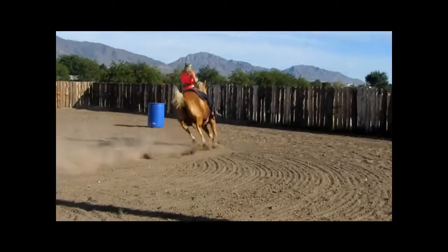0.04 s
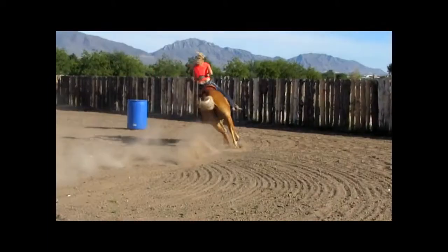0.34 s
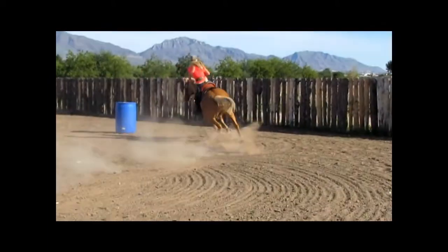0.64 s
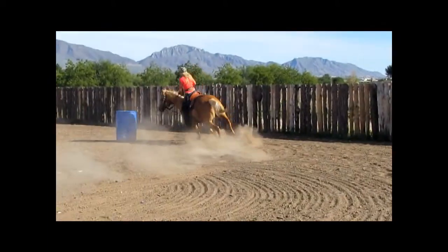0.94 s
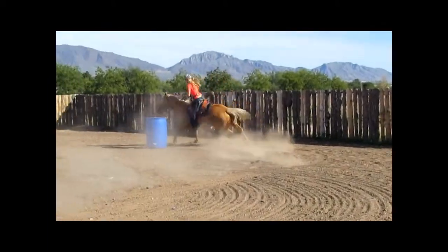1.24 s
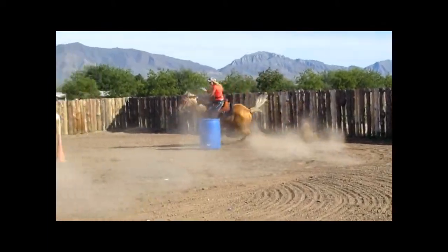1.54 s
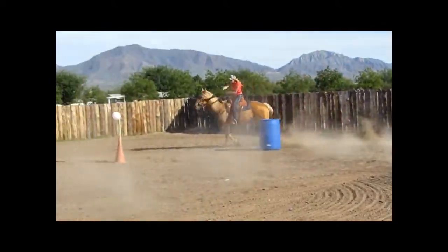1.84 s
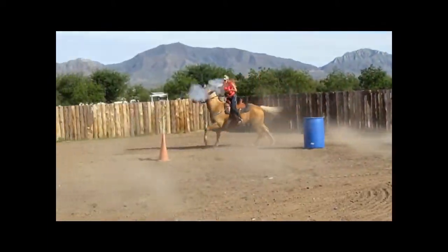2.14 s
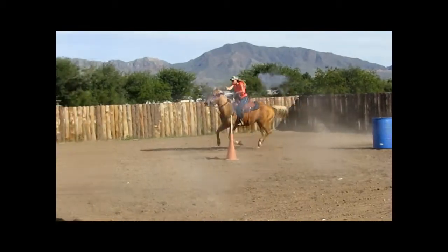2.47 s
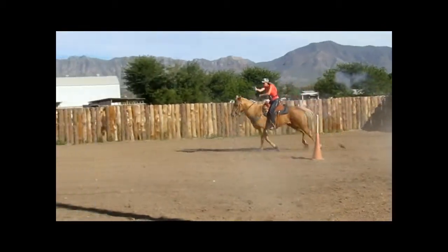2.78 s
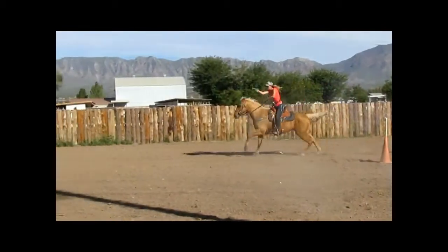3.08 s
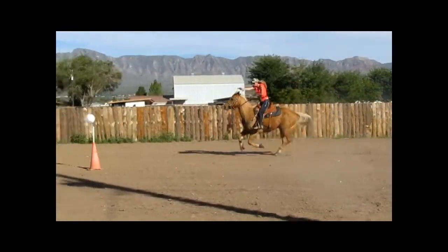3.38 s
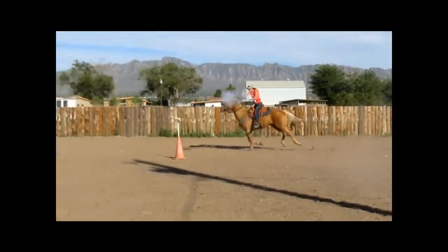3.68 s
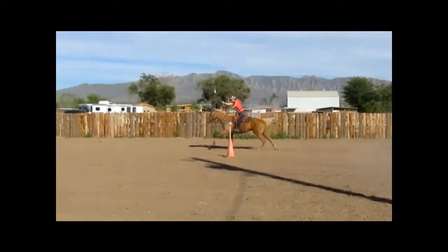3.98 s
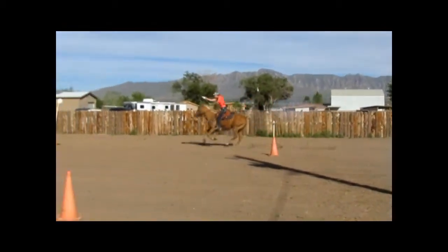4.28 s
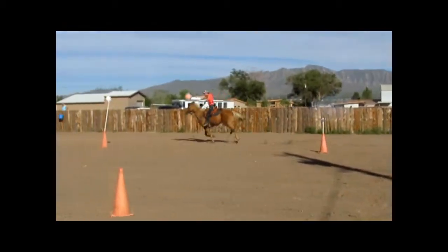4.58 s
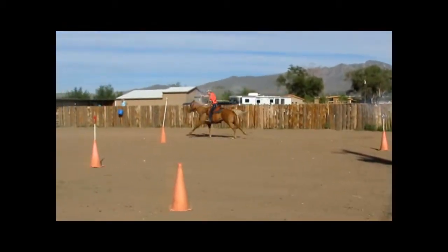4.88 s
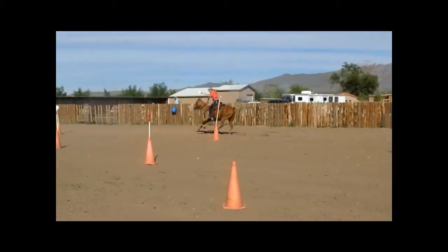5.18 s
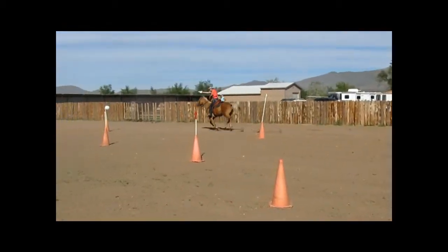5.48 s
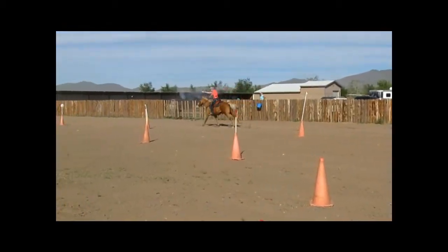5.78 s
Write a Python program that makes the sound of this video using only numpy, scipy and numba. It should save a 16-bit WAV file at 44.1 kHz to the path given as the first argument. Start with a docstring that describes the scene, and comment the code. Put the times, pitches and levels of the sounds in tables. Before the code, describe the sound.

A horse gallops in an open-air dirt arena, heard from some way off over a low outdoor rumble and light gusts on the microphone. For the first two seconds its hooves thud softly, a little to the right, with gritty skids around 0.3 to 0.5 and 1.2 seconds and small knocks of falling clods. A very faint lens motor whine runs until about 2.3 seconds.

At 2.2 seconds a loud, sharp blank revolver shot cracks, followed by others at 3.7, 4.7 and 5.7 seconds. Each briefly overloads the microphone and echoes off a plank fence, sheds and trees, dying away within a second. After every blast the background ducks, then creeps back up. The galloping continues between the shots, with firmer hoofbeats, crunching dirt and knocking clods around 3 to 3.6 seconds. The sound ends near six seconds in the last shot's echo.

```python
"""Four blank revolver shots from a rider galloping round a barrel in an open-air dirt arena.
The camera's stereo microphone is some way off, in a light wind. Each blast overloads it and echoes off
the plank fence, sheds and trees; the gain control ducks at every shot and creeps back up.
Hooves thud, throw clods and skid in loose dirt. Close by, the lens motors whine faintly."""
import sys
import numpy as np
from scipy import signal
from scipy.fft import rfft, irfft
from scipy.io import wavfile
from scipy.ndimage import uniform_filter1d
from numba import njit

SR = 44100
rng = np.random.default_rng(int(sys.argv[2]) if len(sys.argv) > 2 else 0)


def wrap_up_sound(samples):
    """Save the sound to the file named by the first command line argument, as 16-bit audio."""
    columns = np.atleast_2d(samples).T
    # keep every value between -1 and 1, then stretch to whole-number steps
    tamed = np.clip(columns, -1, 1)
    steps = np.round(tamed * 32767).astype(np.int16)
    wavfile.write(sys.argv[1], SR, steps)


N = 261072
TIME = np.arange(N) / SR
# broad rush of loose dirt and of muzzle gas: f/Hz, level/dB
RUSH_SPECTRUM = [(100, -22.5), (400, 3.5), (1100, 2), (2400, -9), (4200, -19), (7300, -18.5), (13000, -27),
                 (14800, -51.5)]


def gunshots(smear_db=-18, smear_t60=0.45, slap_tail_db=-4.5, boom_echo_hz=182.3, lowest_hz=80):
    """Each blast fills the arena; four reflectors each return a sharp slap and a low boom."""
    # t/s, level/dB, ring f/Hz, ring t60/s, boom/dB, boom f/Hz, overtone/dB, scatter/dB, facing fence/dB
    shots = [(2.2395, 35.5, 906, 0.01, -9.5, 220.3, -8, 0.5, -1),
             (3.7329, 35, 858, .015, -9, 195, -19, -0.5, 0.5),
             (4.7431, 34.5, 1010, 0.012, -13.5, 229.6, -14, -3.5, 2),
             (5.7401, 28, 855, 0.0082, -4, 144, -11.5, -13.5, -4)]
    # echo delays, a row per shot as the rider moves: facing fence/s, right fence/s, sheds/s, far wall/s
    echo_delays = [(.0245, .0615, .1867, .281), (.048, .0884, .187, .2584), (.0652, .1058, .162, .2288),
                   (.0758, .119, .167, .2)]
    # those reflectors: slap/dB, tilt/(dB/octave), t60/s, left minus right/dB, boom/dB, drift/(dB/s)
    reflectors = [(-23, -4, .026, -5.5, -24, -1), (-45, 4.5, 0.019, 2, -20, -3),
                  (-32.5, -4.5, 0.034, 1, -41, -2), (-32, -4.5, 0.016, 0, -60, 1.5)]
    # slap off a hard face: f/Hz, level/dB
    slap_spectrum = [(100, -16), (500, -20.5), (900, -11), (1500, 10), (2800, -4.5), (4300, -6.5),
                     (8000, -20), (12500, -29), (15000, -51.5)]
    out, t = np.zeros((2, N)), TIME[:2 ** 13]
    for shot, delays in zip(shots, echo_delays):
        s, db, ring_hz, ring_t60, boom_db, boom_hz, overtone_db, scatter_db, fence_db = shot
        add(out, s, undb(db) * blast(ring_hz, ring_t60, boom_db, boom_hz, overtone_db))
        add(out, s, arena(scatter_db, fence_s=0.048, far_s=delays[2] - 0.012))  # trees ahead of sheds
        for k, (slap_db, tilt, t60, pan_db, low_db, db_per_s) in enumerate(reflectors):
            gain = undb(db + db_per_s * (s - shots[0][0]) + fence_db * (k == 0))
            tail = undb(slap_tail_db) * fade(t, t60) + undb(smear_db) * fade(t, smear_t60)
            slap = undb(slap_db) * pan(pan_db) * strike(slap_spectrum, tail, tick_s=0.00068, tilt=tilt)
            boom = undb(low_db) * pan(-10) * thump(boom_echo_hz, cycles=0.49)
            add(out, s + delays[k], -gain * slap)
            add(out, s + delays[k], gain * boom)
    left, right = cut(out, "highpass", lowest_hz)  # the microphone lets little of the shots' deep bass through
    return np.array([left, np.append(0, right[:-1])])  # the left port hears them a moment sooner


def blast(ring_hz, ring_t60, boom_db, boom_hz, overtone_db, overtone_hz=2750, gas_db=-14):
    """The muzzle's shock front rings the microphone housing, over a low boom and a burst of gas."""
    t = TIME[:SR // 8]
    ring = np.sin(2 * np.pi * ring_hz * t) * fade(t, ring_t60)
    overtone = undb(overtone_db) * np.sin(2 * np.pi * overtone_hz * t) * fade(t, ring_t60)
    boom = undb(boom_db) * np.sin(2 * np.pi * boom_hz * t) * fade(t, t60=0.014)
    gas = undb(gas_db) * noise(RUSH_SPECTRUM, len(t)) * fade(t, t60=0.043)
    return gas - ring - overtone - boom * pan(-2.1)


def arena(scatter_db, fence_s, far_s, patchy_db=1.7, crackle_db=3, bass_hz=400, bass_pan_db=-7):
    """A shot scatters from the rough ground, then the fence planks, then far sheds and trees."""
    # reverberation by band: f/Hz, ground/dB, ground t60/s, fence/dB, fence t60/s, far/dB, far t60/s
    reverberation = [(65, 2.5, 0.06, -21, 0.56, -23, 1), (192, 13, 0.13, -6, 0.46, -13.5, 0.97),
                     (460, 1, 0.17, -10.5, 0.3, -52, 0.91), (1285, 16.5, 0.18, 3, 0.36, -20.5, 1),
                     (2253, 15, 0.095, -1.5, 0.37, -11, 0.72), (4350, 9, 0.096, -6.5, 0.32, -22.5, 0.42),
                     (9000, 0.5, 0.12, -15.5, 0.25, -48, 0.28)]
    out, t = 0, TIME[:3 * 2 ** 14]

    def arrival(db, delay, t60, rise_s):
        """A cluster of reflections builds up and dies away."""
        return undb(db) * fade(t - delay, t60) * (1 - np.exp(-np.maximum(t - delay, 0) / rise_s))

    for hz, ground_db, ground_t60, fence_db, fence_t60, far_db, far_t60 in reverberation:
        ground = arrival(ground_db + scatter_db, 0, ground_t60, rise_s=0.0019)
        fence = arrival(fence_db + scatter_db, fence_s, fence_t60, rise_s=0.0066)
        far = arrival(far_db, far_s, far_t60, rise_s=0.026)
        envelope = np.sqrt(ground ** 2 + fence ** 2 + far ** 2)
        side = pan(bass_pan_db / (1 + (hz / bass_hz) ** 2))  # the fence returns bass from the right
        out = out + band(hz, len(t)) * side * envelope * grains(100, patchy_db, len(t))
    # single planks and branches stand out as crackle above the bass
    crackle = cut(out, "highpass", bass_hz) * grains(300, crackle_db, len(t))
    return cut(out, "lowpass", bass_hz) - crackle


def horse(hoof_hz=175.2, weight_spread_db=2.5, scuff_db=-10, kicked_hz=1200, flight_s=0.025):
    """Four hooves a stride thump and scuff the soft ground, right of centre, and kick up clods."""
    # gallop strides: first hoof t/s, span to the fourth hoof/s, first level/dB, fourth level/dB
    strides = [(-.137, 0.24, -42, -27), (.288, 0.23, -34, -31), (.697, .262, -31.5, -37.5),
               (1.21, 0.2, -42, -37), (1.678, 0.25, -36.5, -27), (1.979, 0.19, -44.5, -40.5),
               (2.74, 0.25, -31, -19), (3.086, 0.24, -26.5, -21.5), (3.488, .21, -23.5, -33),
               (4.021, .28, -25, -26), (4.416, 0.22, -21, -24), (5.06, .245, -24, -21.5),
               (5.402, 0.2, -22.5, -37.5)]
    # when the four hooves land, as shares of that span
    footfalls = [0, .28, .54, 1]
    # the loudest hoof strikes and falling clods: t/s, knock/dB, knock f/Hz, grit/dB
    loud_clods = [(.104, -35, 1000, -80), (.395, -35.5, 1250, -64), (.438, -34.5, 1090, -39),
                  (.448, -38, 1860, -34.5), (.523, -32.5, 1210, -42.5), (.703, -30, 1090, -37),
                  (.818, -37.5, 1440, -56), (1.083, -39, 1330, -63), (1.418, -36, 1080, -67),
                  (1.443, -36, 1660, -52), (1.632, -37, 1670, -44), (1.737, -38, 1340, -55),
                  (1.943, -38, 1060, -60), (1.987, -41, 1200, -61), (2.159, -38, 950, -58.5),
                  (3.309, -27.5, 1750, -42), (3.421, -32, 1860, -33.5), (3.432, -27, 1530, -53),
                  (3.447, -24.5, 1090, -64), (3.597, -34.5, 990, -56), (3.606, -29, 1300, -48),
                  (4.523, -31, 1240, -49), (5.233, -26.5, 1400, -47), (5.532, -31.5, 1300, -49.5),
                  (5.603, -32, 1080, -50), (5.641, -36, 1530, -48)]
    out, t = np.zeros((2, N)), TIME[:2 ** 12]
    for start, span, first_db, last_db in strides:
        for share in footfalls:
            hoof_pitch, clod_pitch, weight = rng.standard_normal(3)
            s = start + share * span
            gain = undb(first_db + share * (last_db - first_db) + weight_spread_db * weight)
            hz = hoof_hz * np.exp(0.12 * hoof_pitch)
            scuff = undb(scuff_db) * band(1.2 * hz, len(t)) * fade(t, t60=0.056)
            add(out, s, gain * pan(-7.5) * (thump(hz, cycles=0.55) + scuff))
            kicked = clod(knock_db=-14.5, hz=kicked_hz * np.exp(0.17 * clod_pitch), grit_db=-40.5)
            add(out, s + flight_s * rng.random(), gain * kicked)
    for s, knock_db, hz, grit_db in loud_clods:
        add(out, s, clod(knock_db, hz, grit_db))
    return out


def clod(knock_db, hz, grit_db, crumble_db=-12, grain_db=5, ring_db=3):
    """A lump of dirt knocks, rings for a few swings and crumbles into grit."""
    # fine grit: f/Hz, level/dB
    grit_spectrum = [(500, -6.5), (2500, -4), (4500, 0.5), (7000, -1), (12500, -8), (15500, -16.5)]
    # a hollow tone with a weaker one an octave up: f/Hz, level/dB
    body = [(hz / 5, -18), (hz / 4.1, -10), (hz, 0), (hz * 1.1, -6),
            (hz * 2, -11), (hz * 2.97, -25), (hz * 9, -52)]
    t = TIME[:2 ** 12]
    crumble = undb(crumble_db) * fade(t, t60=0.07) * grains(460, grain_db, len(t))
    ring = undb(ring_db) * np.sin(2 * np.pi * 1.47 * hz * t) * fade(t, t60=0.008)
    grit_tail = (fade(t, t60=0.022) + crumble) * grains(1500, grain_db, len(t))
    knock = strike(body, fade(t, t60=0.034) + crumble, tick_s=0.00089)
    grit = strike(grit_spectrum, grit_tail, tick_s=0.00045)
    return undb(knock_db) * (knock + ring) + undb(grit_db) * grit


def dirt(flutter_db=0.8):
    """Loose dirt crunches under the horse and sprays where it skids."""
    # swish, loudest as the horse passes nearest the microphone: t/s, level/dB
    swish = [(0, -49.5), (2.2, -50.5), (3.0, -44.5), (3.7, -45.5), (5.92, -52)]
    # hooves skid in the turn: peak t/s, half length/s, level/dB
    skids = [(.3, 0.14, -44), (.49, 0.085, -44), (1.19, 0.034, -45.5)]
    crunch = grains(300, spread_db=4.5)
    swish_db = np.interp(TIME, *np.transpose(swish))
    level = np.sqrt(undb(swish_db) ** 2 + swells(skids))
    return noise(RUSH_SPECTRUM) * level * undb(flutter_db * walk(25)) * crunch


def wind(breeze_db=-47.5, buffet_db=5.5):
    """Eddies buffet the two microphone ports, largely in opposite phase."""
    # rumble at the ports: f/Hz, level/dB
    eddy_spectrum = [(15, -9.5), (30, -7), (70, -2.5), (140, -6), (280, -7), (500, -19), (1000, -33.5),
                     (3000, -57.5)]
    # gusts over the breeze: peak t/s, half length/s, level/dB
    gusts = [(.25, 0.15, -32), (.48, 0.05, -30), (.95, 0.064, -35), (2.8, .3, -34), (3.55, 0.15, -32)]
    eddies = noise(eddy_spectrum, width=[(40, 20), (100, 14), (250, 8.1), (600, 2.2)])
    level = np.sqrt(undb(breeze_db) ** 2 + swells(gusts))
    return eddies * pan(-5) * level * undb(buffet_db * walk(35))


def air(db=-45):
    """Open-air rumble and hiss around the arena, a little to the right."""
    # ambience: f/Hz, level/dB
    air_spectrum = [(20, -14.5), (70, 11), (170, 6), (330, -2.5), (600, -9), (1050, -0.5), (1800, -15.5),
                    (2800, -18.5), (4000, -22), (5300, -22.5), (9000, -33.5), (13300, -30.5),
                    (14500, -43.5)]
    return noise(air_spectrum) * pan(-4) * undb(db + walk(30))


def lens(waver=0.0066, ramp_s=0.036):
    """Small motors in the camera, next to the microphone, whine with an unsteady pitch."""
    # motor runs: start t/s, end t/s, f/Hz, level/dB
    whines = [(0, .5, 7400, -70), (.5, 2.3, 5330, -74), (1.72, 2.3, 491, -58)]
    out = 0
    for start, end, hz, db in whines:
        running = np.clip(np.minimum(TIME - start, end - TIME) / ramp_s, 0, 1)
        phase = 2 * np.pi * np.cumsum(hz * (1 + waver * walk(140))) / SR
        out = out + undb(db) * running * np.sqrt(2) * np.sin(phase)
    return out


def thump(hz, cycles):
    """A heavily damped push: about one and a half swings of pressure."""
    turn = TIME[:2 ** 12] * hz
    return -np.sin(2 * np.pi * turn) * turn / cycles * np.exp(.5 - .5 * (turn / cycles) ** 2)


def strike(spectrum, tail, tick_s, tilt=0):
    """One sharp push, as strong as tick_s of noise, and a noisy tail, through a causal resonance."""
    size = len(tail)
    gain = colour(spectrum, size, tilt)
    # minimum phase: nothing rings ahead of the push
    cepstrum = irfft(np.log(gain / np.sqrt(np.mean(gain ** 2))))
    cepstrum[1:size // 2] *= 2
    cepstrum[size // 2 + 1:] = 0
    drive = noise([(1, 0), (SR, 0)], size) * tail
    drive[:, 0] += np.sqrt(tick_s * SR)
    return irfft(rfft(drive) * np.exp(rfft(cepstrum)))


def noise(spectrum, size=N, width=None):
    """Stereo noise of rms 1 with a given spectrum."""
    # stereo width at the microphone: f/Hz, side minus mid/dB
    field_width = [(60, -5.5), (300, -1), (700, -3.5), (1300, -11), (2400, -4), (4400, -1.5), (8000, 0),
                   (15000, -1.5)]
    mid, side = rfft(rng.standard_normal((2, size))) * colour(spectrum, size)
    side = side * colour(width or field_width, size)
    pair = irfft(np.array([mid + side, mid - side]), size)
    return pair / pair.std()


def band(hz, size):
    """Stereo noise about an octave wide."""
    spectrum = [(hz / 4, -40), (hz / 1.57, -3), (hz, 0), (hz * 1.286, -4), (hz * 2.42, -26), (hz * 5, -70)]
    return noise(spectrum, size)


def colour(spectrum, size, tilt=0):
    """Gain per FFT bin from (f/Hz, level/dB) rows, tilted in dB per octave above 500 Hz."""
    hz = np.maximum(np.fft.rfftfreq(size, 1 / SR), 1)
    at, db = np.transpose(spectrum)
    octaves = np.log2(np.maximum(hz / 1000, .5))
    return undb(np.interp(np.log(hz), np.log(at), db) + tilt * octaves)


def grains(rate, spread_db, size=N):
    """Uneven sizes of many tiny impacts, rms 1."""
    gain = undb(spread_db * walk(rate, size))
    return gain / np.sqrt(np.mean(gain ** 2))


def walk(rate, size=N):
    """Random levels held 1 / rate s and slewed; spread near 1."""
    hold = max(int(SR / rate), 1)
    return 1.015 * uniform_filter1d(rng.standard_normal(size)[np.arange(size) // hold], hold)


def swells(rows):
    """Summed power of bell-shaped swells."""
    return sum(undb(db) ** 2 * np.exp(-((TIME - s) / half) ** 2) for s, half, db in rows)


def fade(t, t60):
    """Exponential decay that starts at t = 0."""
    return (t >= 0) * 1000. ** (-np.maximum(t, 0) / t60)


def cut(sound, kind, hz):
    """Second-order high-pass or low-pass."""
    return signal.sosfilt(signal.butter(2, hz, kind, fs=SR, output="sos"), sound)


def undb(db):
    """Decibels to gain."""
    return 10 ** (np.asarray(db) / 20)


def pan(db):
    """Channel gains for a left minus right level."""
    return undb(np.array([[db], [-db]]) / 2)


def add(out, s, sound):
    """Mix a sound in at time s, if that lies within the scene."""
    start = int(s * SR)
    if 0 <= start < N:
        out[:, start:start + sound.shape[-1]] += sound[..., :N - start]


@njit
def follow(x, attack, release):
    """Level follower: jumps up with a peak and sinks slowly."""
    out, level = np.empty(len(x)), 1e-6
    for i in range(len(x)):
        level = level + (x[i] - level) * attack if x[i] > level else level * release
        out[i] = level
    return out


def scene():
    """The arena from the microphone's position."""
    return gunshots() + horse() + dirt() + wind() + air() + lens()


def record(dry, attack_s=0.0012, recover_db_per_s=19, target=0.41, ceiling=0.49, top_hz=15500):
    """The camera's gain ducks too late for a blast's first swings, which overload; the top is cut."""
    # narrow bands the camera notches out: f/Hz, width/Hz
    notches = [(3930, 160), (7880, 78)]
    level = follow(np.abs(dry).max(axis=0), 1 / (attack_s * SR), float(undb(-recover_db_per_s / SR)))
    out = np.clip(dry * np.minimum(1, target / level), -ceiling, ceiling)
    for hz, width in notches:
        out = signal.lfilter(*signal.iirnotch(hz, hz / width, fs=SR), out)
    return signal.sosfilt(signal.ellip(8, .2, 70, top_hz, fs=SR, output="sos"), out)


dry = scene()
out = record(dry)
wrap_up_sound(out)
```